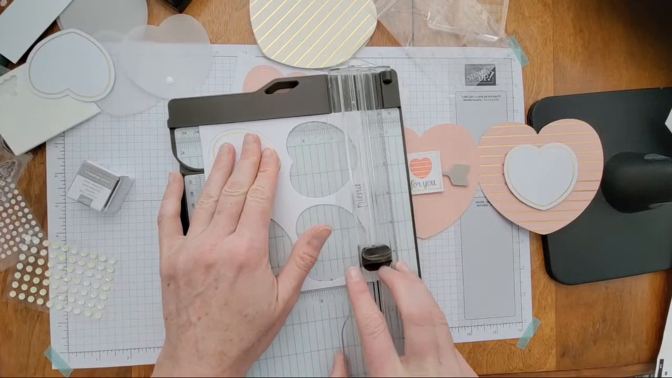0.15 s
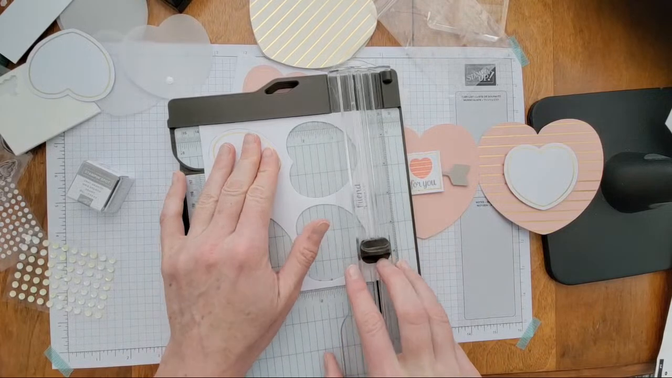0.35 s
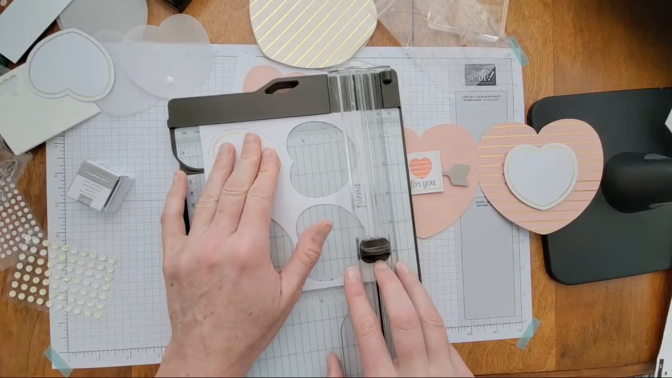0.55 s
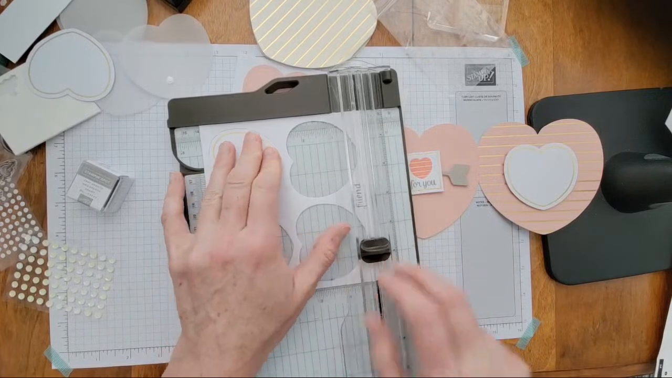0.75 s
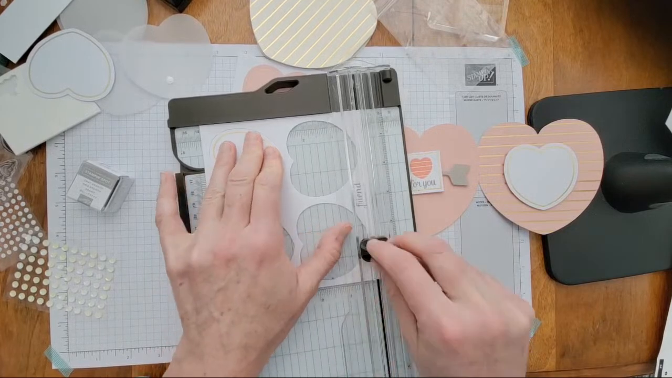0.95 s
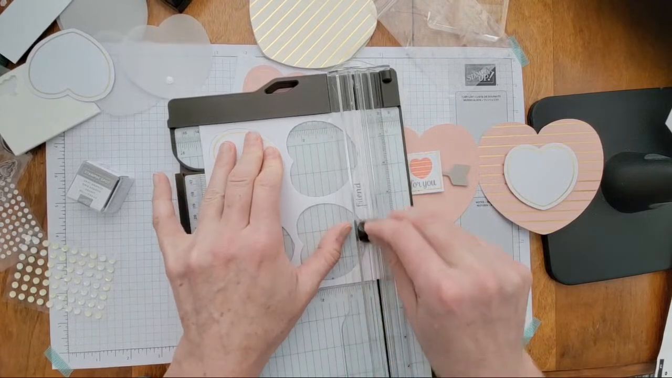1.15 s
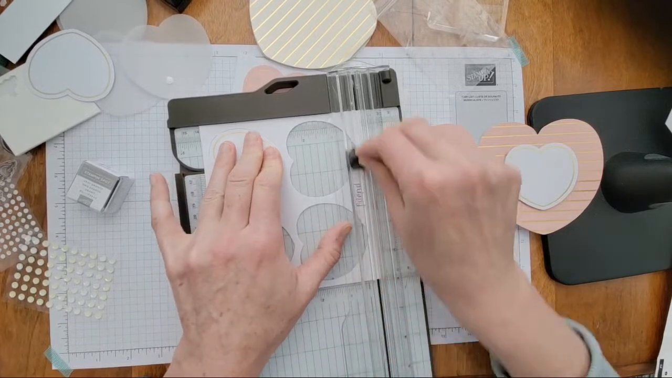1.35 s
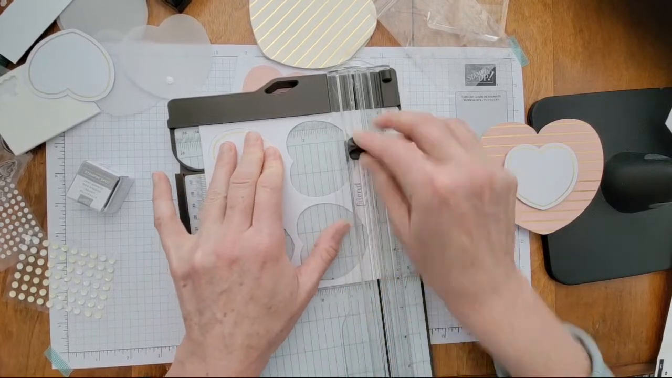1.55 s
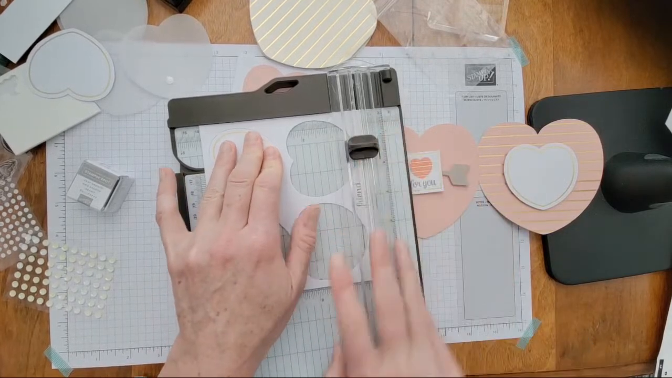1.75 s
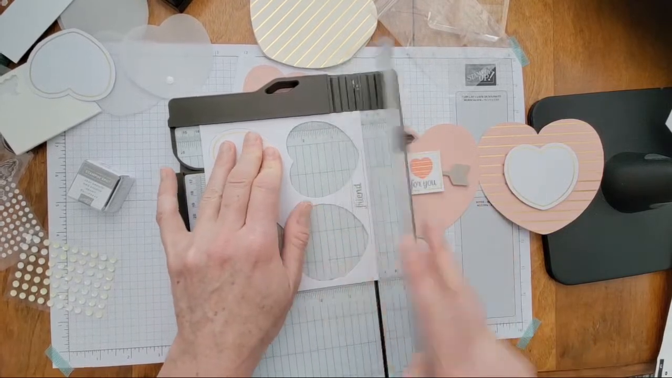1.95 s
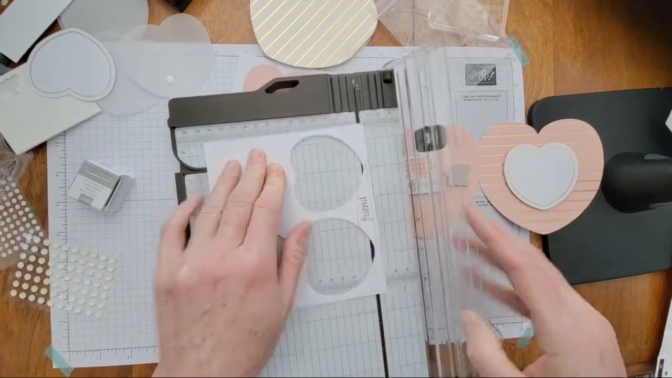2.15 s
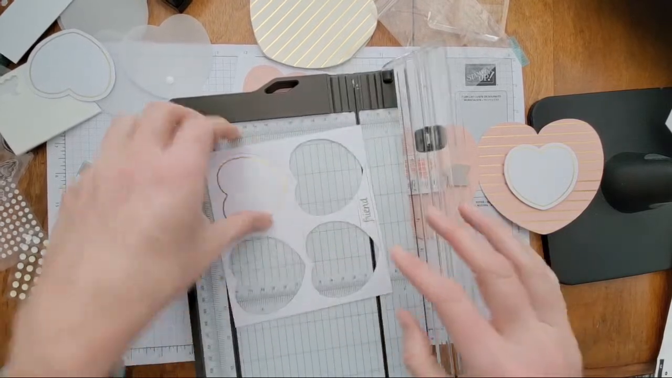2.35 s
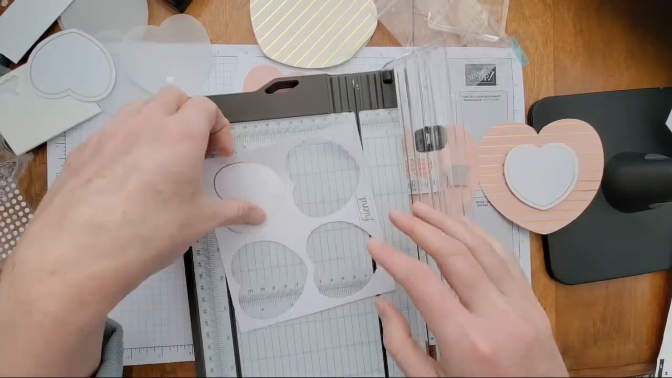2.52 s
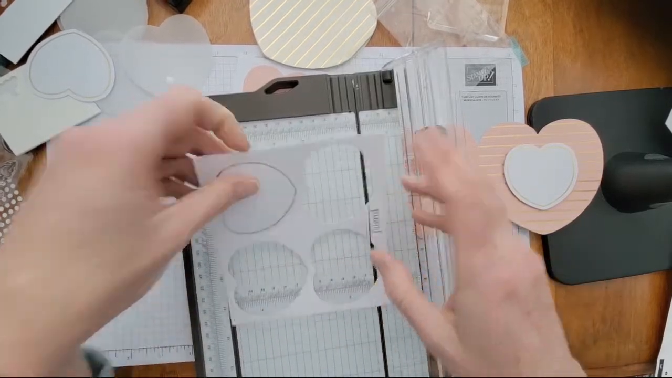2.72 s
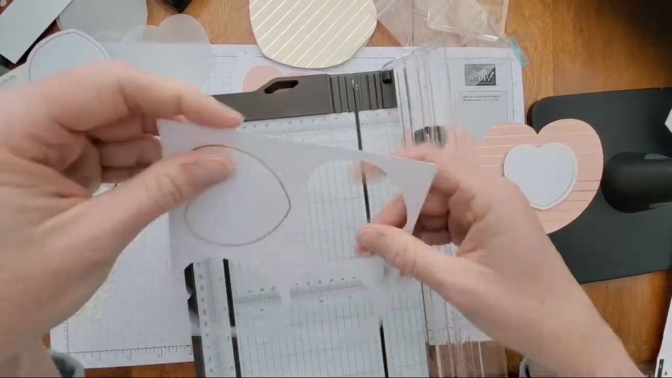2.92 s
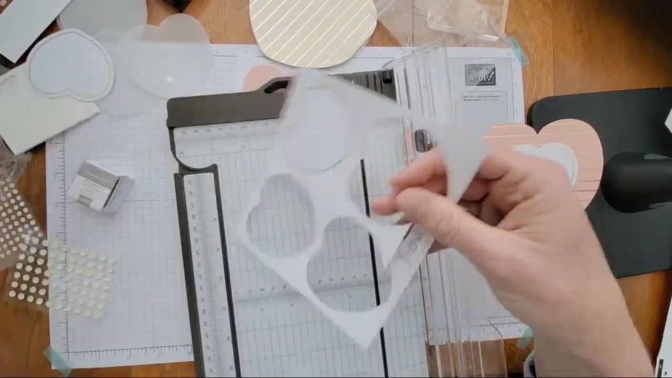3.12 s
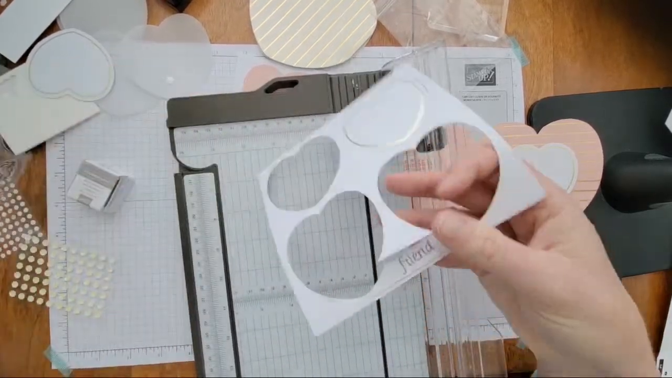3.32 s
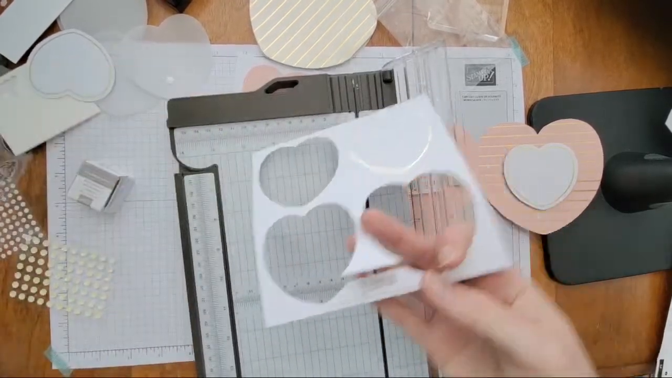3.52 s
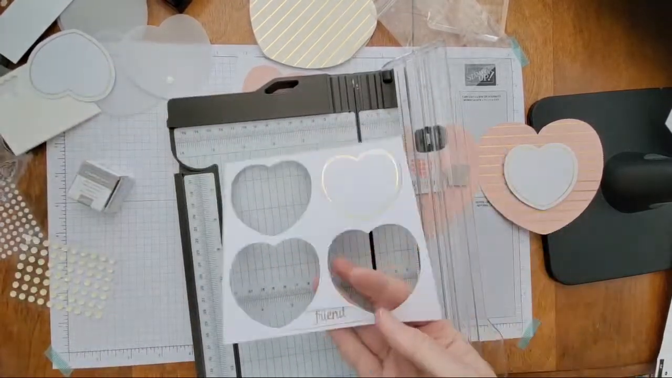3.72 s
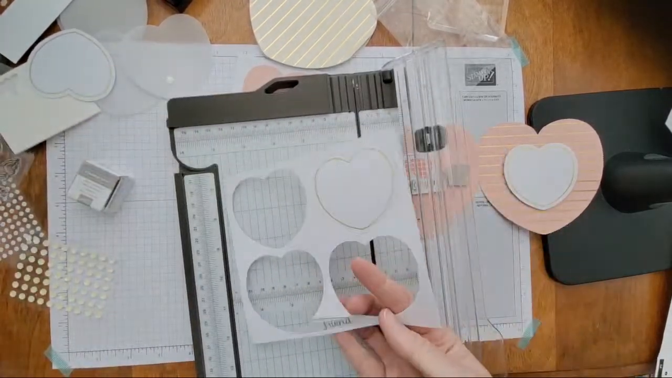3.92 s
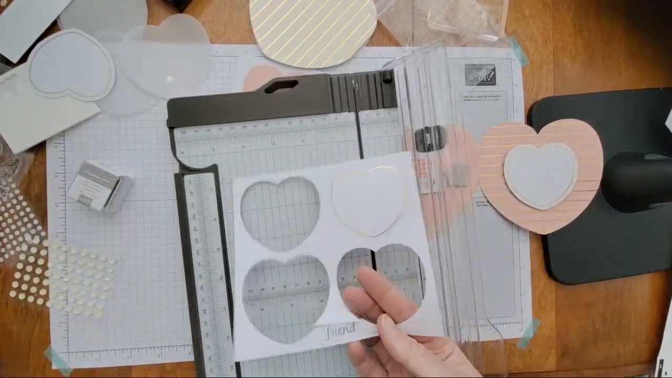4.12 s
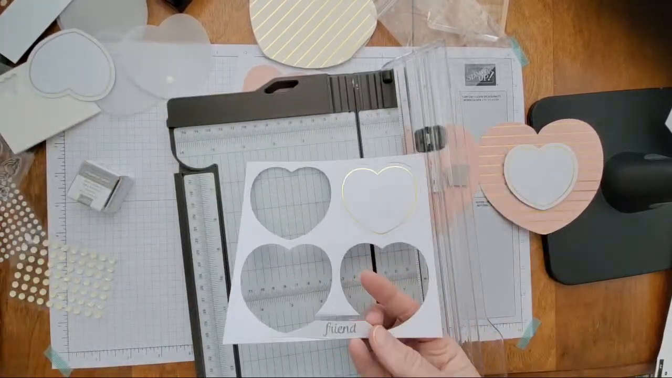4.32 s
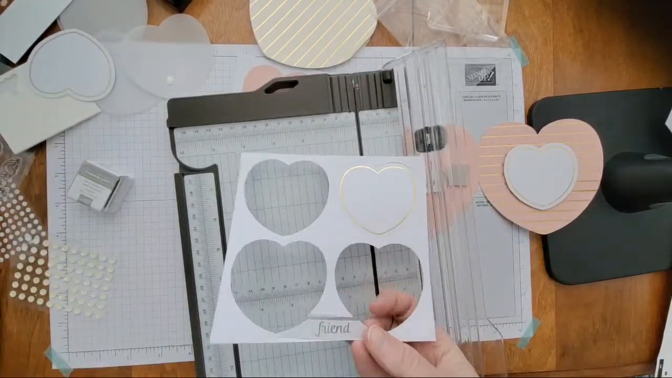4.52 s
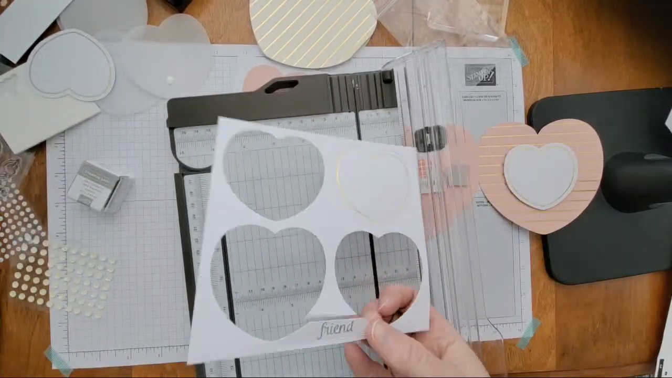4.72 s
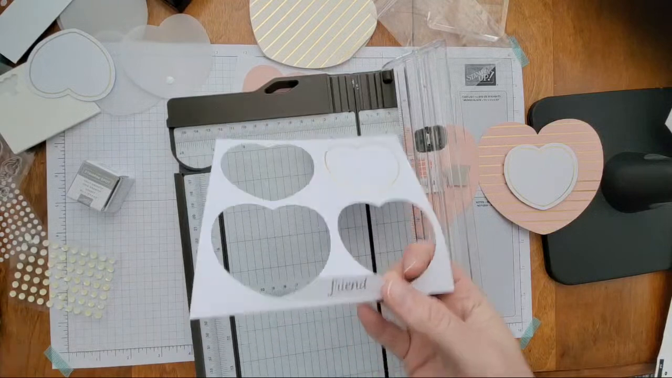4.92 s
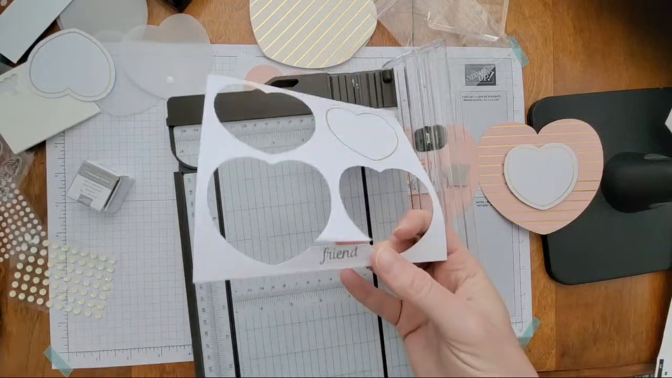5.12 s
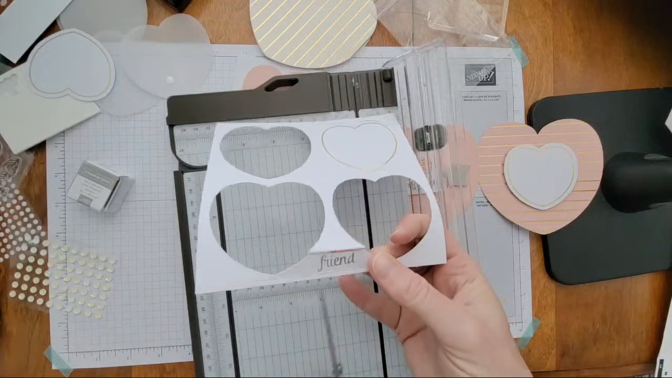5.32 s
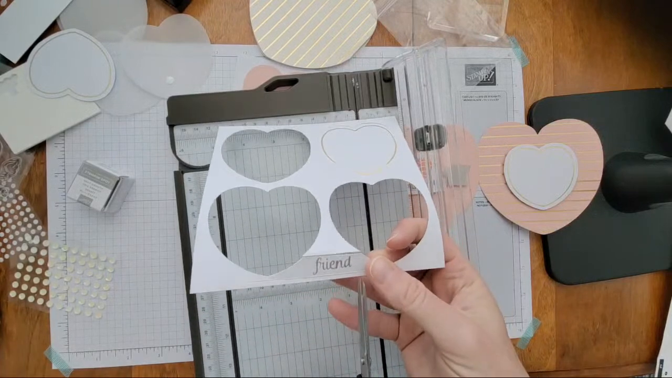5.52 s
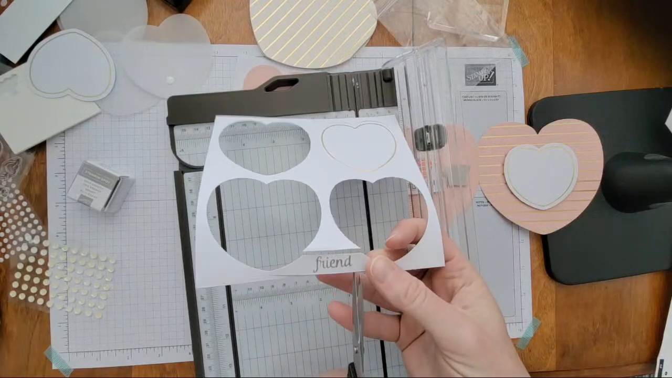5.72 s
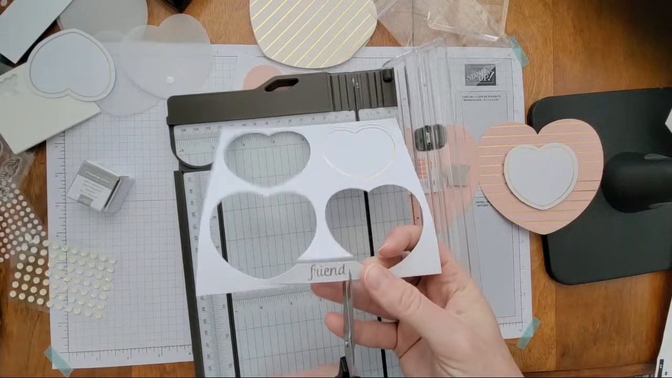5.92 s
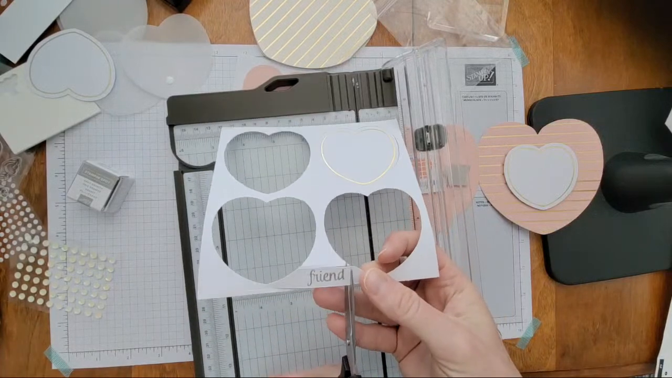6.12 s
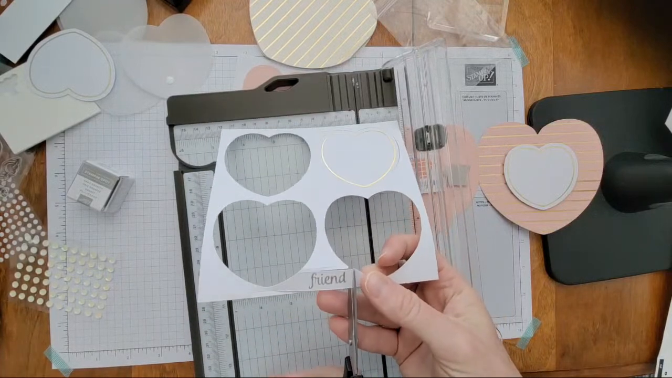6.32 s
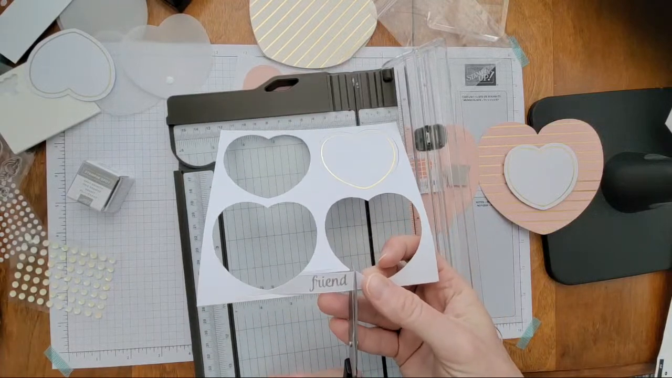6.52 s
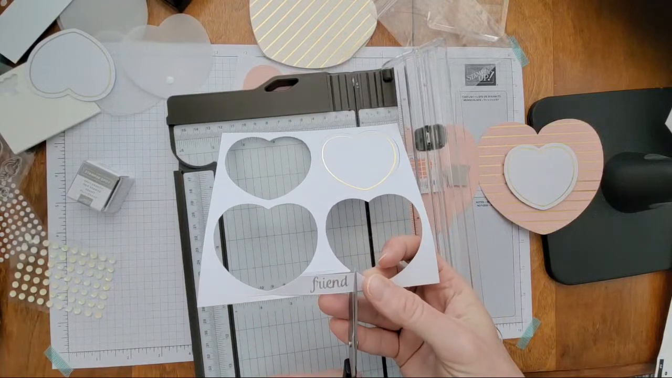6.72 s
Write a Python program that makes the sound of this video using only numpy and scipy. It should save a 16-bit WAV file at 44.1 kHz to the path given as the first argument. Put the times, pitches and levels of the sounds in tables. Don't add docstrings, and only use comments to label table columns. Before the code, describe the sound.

On a wooden craft desk, a trimmer carriage clicks and rips through card, its rail clatters open, the stiff card taps about, and scissors softly part.

```python
import sys
import numpy as np
from scipy import signal
from scipy.fft import rfft, irfft, next_fast_len
from scipy.io import wavfile
from scipy.ndimage import uniform_filter1d

SR = 44100
rng = np.random.default_rng(int(sys.argv[2]) if len(sys.argv) > 2 else 0)


def gain_from_db(level_db):
    decades = np.asarray(level_db, float) / 20
    return 10 ** decades


def master(y):
    cut = np.clip(np.atleast_2d(y).T, -1, 1)
    pcm = np.round(cut * 32767)
    wavfile.write(sys.argv[1], SR, pcm.astype(np.int16))


N = 302419


def rms_one(x):
    return x / np.sqrt(np.mean(x ** 2) + 1e-20)


def peak_one(x):
    return x / (np.max(np.abs(x)) + 1e-20)


def cut(x, hz, kind, order=2):
    return signal.sosfilt(signal.butter(order, hz, kind, fs=SR, output="sos"), x)


def coloured(x, spectrum):
    hz, db = np.transpose(spectrum)
    size = next_fast_len(len(x))
    freqs = np.fft.rfftfreq(size, 1 / SR) + 1
    gain = gain_from_db(np.interp(np.log(freqs), np.log(hz), db))
    return rms_one(irfft(rfft(x, size) * gain, size)[:len(x)])


def drift(rate_hz):
    pole = np.exp(-2 * np.pi * rate_hz * 40 / SR)
    noise = rng.standard_normal(N // 40 + 2002)
    slow = signal.lfilter([1], [1, -2 * pole, pole ** 2], noise)[2000:]
    return np.interp(np.arange(N) / 40, np.arange(len(slow)), rms_one(slow))


def grains(size, per_s, spread_db):
    chance, strength, sign = rng.random((3, size))
    heights = gain_from_db(-spread_db * np.log(strength + 0.001))
    return (chance < per_s / SR) * heights * np.sign(sign - .5) + 1e-9


def ring(x, hz, t60):
    r, w = gain_from_db(-60 / (max(t60, .002) * SR)), 2 * np.pi * hz / SR
    return signal.lfilter([0, np.sin(w)], [1, -2 * r * np.cos(w), r * r], x)


def resonance(x, hz, width_hz):
    return rms_one(ring(x, hz, 2.2 / width_hz))


def swells(rows):
    t = np.arange(0, N + 40, 40) / SR
    power = 0
    for s, db, rise, fall in rows:
        below_peak = np.maximum((s - t) / rise, (t - s) / fall)
        power = power + gain_from_db(2 * db - 40 * below_peak)
    return np.interp(np.arange(N) / SR, t, np.sqrt(power))


# f/Hz, level/dB per Hz
HUSH = [(30, -29.5), (41, -22), (60, -19), (98, -11.5), (145, -13), (183, -16.5), (221, -8.5), (327, -17),
        (393, -8.5), (425, -19), (582, -35), (664, -30.5), (2200, -40.5), (7050, -47), (11000, -42.5),
        (15900, -46.5)]


def room_tone(desk):
    hush = coloured(rng.standard_normal(N), HUSH)
    rumble = cut(hush, 550, "low", order=6)
    desk_power = uniform_filter1d(desk ** 2, int(.12 * SR))
    busy = np.maximum(desk_power, 1e-14) ** .15
    rumble_gain = (gain_from_db(-67.5) + gain_from_db(-51) * busy) * gain_from_db(1.2 * drift(4))
    return rumble_gain * rumble + gain_from_db(-66.5) * (hush - rumble)


# f/Hz, level/dB, t60/s
BOARD_MODES = [(448, -3, 0.03), (659, -2, 0.043), (773.6, -3, 0.038), (862.6, -7.5, 0.08), (970, 3, 0.027),
               (1197.3, 3, 0.02), (1461, -5, 0.062), (1657, 5.5, 0.017), (2066, 5.5, 0.013),
               (2480, 3, .012), (2950, 2, .011), (3500, -1, 0.01), (4120, -16.5, 0.013)]


def contacts(rows, click_db, crack_db, rattle_s, landing_s, size=7000):
    out, t = np.zeros(N + size), np.arange(size) / SR
    landing = (1 - np.exp(-t / landing_s)) * np.exp(-t / landing_s)
    dying = gain_from_db(-60 * t / rattle_s) * (1 - np.exp(-t / 0.0054))
    for s, peak_db, hz, hard_db in rows:
        slips = grains(size, per_s=8000, spread_db=2.0)
        rattle = slips * (landing + 0.21 * dying)
        strengths = gain_from_db(rng.normal(0, 2.5, len(BOARD_MODES)))
        board = sum(g * gain_from_db(db) * ring(rattle, f, t60) for g, (f, db, t60) in zip(strengths, BOARD_MODES))
        body = cut(peak_one(board) + 0.45 * peak_one(rattle), [300, 4000], "band")
        own = ring(rattle, hz, 25 / hz)
        click = cut(slips * (landing + .17 * dying), [1600, 5000], "band")
        crack = cut(slips * (landing + 0.04 * dying), [4600, 12500], "band")
        hit = peak_one(body) * min(1, (1500 / hz) ** 1.5) + .55 * peak_one(own)
        hit = peak_one(hit) + gain_from_db(click_db + hard_db) * peak_one(click)
        hit = hit + gain_from_db(crack_db + hard_db) * peak_one(crack)
        at = round(s * SR)
        out[at:at + size] += gain_from_db(peak_db) * hit
    return out[:N]


# t/s, peak level/dB, own ring f/Hz, hardness/dB
TRIMMER_KNOCKS = [(0.093, -46.5, 990, -5), (0.184, -46, 974, -10), (0.216, -38, 3750, -4),
                  (0.227, -47, 969, -20), (0.308, -35, 600, -17), (0.54, -60, 490, -12),
                  (0.744, -55, 454, -5), (0.7555, -35, 1900, 3), (0.849, -54.5, 650, 6),
                  (0.878, -42, 860, -19), (1.008, -52.5, 630, -12), (1.027, -44.5, 1010, -14),
                  (1.045, -33, 1026, -4), (1.108, -39, 590, -18), (1.516, -53, 1010, -5),
                  (1.534, -59, 1050, 11), (1.576, -41, 615, -23), (1.584, -36, 500, -22),
                  (1.637, -38, 560, -3), (1.816, -42, 400, -22), (1.868, -42.5, 1500, -5),
                  (1.879, -49, 1120, 2), (1.913, -38, 510, -3), (1.922, -26.5, 990, 0),
                  (1.956, -20, 950, -11), (1.971, -20, 617, -4), (1.999, -28.5, 640, -14),
                  (2.061, -27, 930, -10), (2.079, -35.5, 759, -8), (2.099, -32, 1820, -16)]


def trimmer_knocks():
    return contacts(TRIMMER_KNOCKS, click_db=1.0, crack_db=-14, rattle_s=.12, landing_s=.0017)


# t/s, peak level/dB, f/Hz, t60/s
PINGS = [(0.298, -58, 6960, 0.025), (1.047, -41.5, 6730, 0.034), (1.604, -36, 2900, .01),
         (1.6095, -19, 4250, .005), (1.6095, -22, 6800, .005), (1.613, -33, 3200, .07),
         (1.619, -36, 3600, .05), (1.617, -38, 7600, .04), (4.055, -25, 1080, .03), (4.056, -33, 1900, .05),
         (4.2275, -25, 2540, .012), (.755, -39, 2300, .03), (.093, -50, 1800, .02), (4.415, -41, 1860, .03),
         (5.995, -68, 7000, .012), (6.157, -70, 4000, .01), (1.635, -38, 620, .05), (1.604, -36, 7430, .02),
         (1.6093, -18, 3300, 0.0044), (1.6093, -22, 5460, 0.0026), (1.6105, -20, 7760, 0.0048),
         (3.597, -51, 870, 0.16), (3.927, -44.5, 860, 0.18), (2.413, -31.5, 1050, 0.027),
         (2.619, -38.5, 8600, 0.0077), (3.37, -38, 1860, 0.13), (3.477, -46, 3320, 0.08),
         (3.374, -38, 850, 0.2), (3.478, -40, 856, 0.13), (3.715, -52, 850, .1), (4.061, -40, 4734, 0.09),
         (4.06, -40, 3150, 0.035), (4.228, -38, 4550, .04), (3.904, -37, 6600, .012),
         (4.653, -46, 5450, .012), (5.02, -60, 4350, .1), (5.075, -58, 4500, .05), (2.095, -44, 3800, .03),
         (4.144, -42, 2800, 0.099), (2.894, -35, 1820, 0.02), (4.512, -35, 1784, 0.04),
         (5.689, -64, 3830, 0.008), (5.689, -66, 8500, 0.006), (6.07, -62, 4800, .03),
         (6.755, -58.5, 1140, 0.012)]


def pings(size=6000):
    out, t = np.zeros(N + size), np.arange(size) / SR
    for s, peak_db, hz, t60 in PINGS:
        chatter = rng.standard_normal(size) * np.exp(-t / (.11 * t60)) + 1e-12
        pair = ring(chatter, hz, .6 * t60) + .5 * ring(chatter, 1.04 * hz, .6 * t60)
        at = round(s * SR)
        out[at:at + size] += gain_from_db(peak_db) * peak_one(pair)
    return out[:N]


# f/Hz, t60/s, level/dB
ECHO_BANDS = [(150, 0.62, -8.5), (500, 0.14, -28), (1500, 0.15, -20.5), (4500, 0.29, -30.5),
              (12000, 0.05, -13.5)]


def room_echoes(x, size=20000):
    t, echo = np.arange(size) / SR, 0
    for hz, t60, db in ECHO_BANDS:
        band = cut(rng.standard_normal(size), [hz / 1.75, min(hz * 1.75, .45 * SR)], "band")
        echo = echo + gain_from_db(db) * band * gain_from_db(-60 * t / t60) / np.sqrt(t60 * SR / 14)
    after_gap = np.clip(t / 0.018 - .5, 0, 1)
    return signal.fftconvolve(x, echo * after_gap)[:N]


# peak t/s, level/dB, 20 dB rise/s, 20 dB fall/s
RUBS = [(.22, -68, .12, .6), (.838, -61.5, .18, .14), (1.05, -53, .055, .03), (1.61, -51, .08, .06),
        (1.946, -30, .022, .11), (2.12, -49, .15, .06), (2.8, -69, .6, .6), (3.054, -66, .2, .1),
        (3.52, -60, .2, .25), (3.8, -56, .1, .22), (4.14, -46.5, .16, .15), (4.44, -58, .03, .2),
        (4.54, -52, .06, .26), (4.985, -56, .015, .25), (4.78, -65, .08, .25)]
# peak t/s, level/dB, 20 dB rise/s, 20 dB fall/s
FLEXES = [(.3, -79, .6, .13), (.838, -71, .09, .11), (1.89, -76, .4, .15), (2.076, -65, .09, .14),
          (2.62, -69, .25, .9), (2.8, -66, .9, .22), (3.054, -71, .25, .15), (3.28, -76, .4, .05),
          (3.45, -71, .15, .5), (3.75, -61.5, .3, .13), (4.14, -58, .35, .05), (4.32, -70, .07, .8),
          (5.0, -72, .04, .25), (5.24, -74.5, .16, .25)]
# f/Hz, level/dB per Hz
RUBBING = [(180, -59), (300, -1.5), (740, -2.5), (849, -3.5), (1330, -5.5), (1460, -9), (3410, -24),
           (6000, -38), (7800, -51), (13200, -120)]
# f/Hz, level/dB per Hz
RUSTLE = [(1180, -32.5), (2000, -3), (2930, -3), (3540, -9), (4280, 3), (5790, -4), (8330, 2), (10600, -5),
          (15800, -1.5)]


def card():
    fibres = grains(N, per_s=15000, spread_db=3.0) * gain_from_db(1.2 * drift(25))
    clumped = fibres * np.sqrt(np.abs(fibres))
    rub = swells(RUBS)
    grit = gain_from_db(-1.0) * rub ** 1.4 * rms_one(cut(fibres, [2200, 4800], "band"))
    rustle = swells(FLEXES) * coloured(clumped, RUSTLE)
    return rub * coloured(fibres, RUBBING) + grit + rustle


# t/s, peak level/dB
THUDS = [(0.227, -59), (1.02, -50), (1.583, -45), (1.813, -50.5), (1.923, -32), (1.953, -34), (1.968, -26),
         (1.998, -25.5), (2.031, -39), (2.06, -40), (2.099, -42), (2.425, -41), (3.366, -47), (4.056, -45),
         (4.236, -29), (4.279, -37), (4.318, -48)]
# f/Hz, level/dB, t60/s
DESK_MODES = [(95, -12.5, 0.21), (112, 8, 0.25), (136, 13, .17), (205, 3, 0.08)]


def thuds():
    s, peak_db = np.transpose(THUDS)
    at, out = [round(hit * SR) for hit in s], np.zeros(N)
    for hz, mode_db, t60 in DESK_MODES:
        strengths = gain_from_db(peak_db + mode_db - 17 + rng.normal(0, 2.5, len(at)))
        pushes = np.full(N, 1e-12)
        pushes[at] = strengths * rng.choice([-1, 1], len(at))
        out += ring(pushes, hz, t60)
    return cut(out, [75, 350], "band")


# t/s, peak level/dB, own ring f/Hz, hardness/dB
BOUNCES = [(0.296, -47, 1300, 0), (1.593, -32, 420, -24), (1.645, -41, 3900, 0), (1.672, -52, 2200, 0),
           (1.688, -54, 3800, 0), (1.715, -55, 1300, 0), (2.11, -35, 1200, -8), (2.13, -37, 1100, -10),
           (2.413, -29, 900, -12), (4.38, -55, 2500, 4), (4.8, -54, 1500, -4), (1.588, -36, 330, -24),
           (1.919, -29, 1500, 0), (1.926, -27, 2000, 0), (1.951, -25, 2100, -1), (1.982, -26, 900, -8),
           (2.057, -48, 3700, 0), (3.788, -31, 800, -8), (3.797, -28, 2200, -4), (3.802, -28, 700, -8),
           (3.817, -33, 850, -12), (3.842, -36, 750, -12), (3.878, -44, 750, -12), (4.049, -46, 900, 2),
           (4.1, -46, 4200, 0), (4.122, -42, 800, -8), (4.145, -38, 900, -10), (4.223, -42, 1500, 0),
           (4.235, -27, 600, -8), (4.264, -33, 900, -6), (4.412, -31.5, 1040, -16), (4.43, -45, 900, -10),
           (4.518, -33, 1000, -8), (4.527, -35, 850, -10), (4.55, -42, 1500, -8), (4.612, -53, 4300, -2),
           (4.963, -45, 1100, -6), (4.978, -41, 750, -14), (4.99, -43, 1600, -5), (5.0, -45, 1450, -6),
           (5.035, -50, 2000, -4), (5.058, -49, 800, -12), (5.145, -56, 950, -10), (5.209, -44.5, 1100, -5)]


def bounces():
    return contacts(BOUNCES, click_db=-2.0, crack_db=-12, rattle_s=.045, landing_s=.0015, size=3000)


# t/s, rise/s, hold/s, level/dB, lowest f/Hz
SWEEPS = [(0.785, .01, 0.087, -73.5, 2500), (1.605, .003, 0.008, -41, 2500),
          (1.911, 0.0054, 0.026, -44, 2980), (2.117, 0.024, 0.077, -57, 6740),
          (2.407, .004, 0.055, -67, 3000), (2.642, 0.0066, 0.076, -54.5, 2970),
          (2.971, 0.0081, 0.057, -63.5, 2500), (3.123, .004, .03, -65.5, 3000),
          (3.25, 0.024, 0.079, -71.5, 5200), (3.37, .006, 0.12, -68, 3040), (3.72, 0.077, 0.061, -67, 3000),
          (4.04, .004, 0.11, -60, 3000), (4.222, 0.0034, 0.025, -58, 2980),
          (4.603, 0.021, 0.046, -67.5, 3500), (4.958, 0.0068, 0.12, -70, 2500),
          (5.22, 0.026, 0.11, -77.5, 6000)]


def sweeps():
    out, t = np.zeros(N), np.arange(N) / SR
    hiss = coloured(grains(N, per_s=20000, spread_db=1.6) * gain_from_db(1.2 * drift(40)), RUSTLE)
    for s, rise, hold, db, low_hz in SWEEPS:
        part = slice(round(s * SR), round((s + .6) * SR))
        age = t[part] - s
        fade = gain_from_db(-60 * np.maximum(age - rise - hold, 0) / (.12 + 1.6 * hold))
        shape = np.clip(age / rise, 0, 1) * fade
        out[part] += gain_from_db(db) * shape * cut(hiss[part], low_hz, "high")
    return out


def patchy(x):
    edges = 700 * 2 ** np.arange(0, 5, .5)
    out = cut(x, 700, "low")
    for k, (low, high) in enumerate(zip(edges, edges[1:])):
        bite = gain_from_db(1.6 * drift(30)[:len(x)])
        out = out + bite * cut(x, [low, high], "band") * (-1) ** k
    return rms_one(out)


# t/s, level/dB
STROKE = [
    (1.088, -77),
    (1.112, -50),
    (1.2, -44),
    (1.268, -43),
    (1.298, -43.5),
    (1.47, -46),
    (1.512, -66),
    (1.53, -66),
]
# f/Hz, level/dB per Hz
SCRAPE = [(120, -20), (200, -3), (322, -9.5), (353, 1), (490, -3), (610, 1), (1140, -3.5), (1930, -7.5),
          (2730, -2.5), (5470, -3.5), (9300, -7.5), (15800, -14)]
# f/Hz, width/Hz, level/dB, t/s, half span/s
RAIL = [(600, 120, 4, 1.18, 0.07), (900, 180, 0, 1.35, 0.029), (2836, 90, 7, 1.145, 0.03),
        (4250, 260, 1.5, 1.16, 0.04), (8400, 180, 0, 1.19, .015), (2600, 500, 6, 1.23, 0.035),
        (4900, 500, 4, 1.235, .035), (4720, 155, -3, 1.4, .03), (4025, 190, -1, 1.38, 0.024),
        (2800, 240, -1, 1.38, 0.016), (7460, 300, -2, 1.3, 0.026), (15570, 70, -6.5, 1.3, .2)]


def blade(size=2 * SR):
    t = np.arange(size) / SR
    s, drag_db = np.transpose(STROKE)
    drag = gain_from_db(np.interp(t, s, drag_db, -140, -140))
    tearing = rms_one(grains(size, per_s=10000, spread_db=2.5))
    rail = 0
    for hz, width_hz, db, passing_s, span in RAIL:
        nearness = np.exp(-.5 * ((t - passing_s) / span) ** 2)
        rail = rail + gain_from_db(db - 12.5) * nearness * resonance(tearing, hz, width_hz)
    desk = sum(gain_from_db(db) * ring(tearing, hz, t60) for hz, db, t60 in DESK_MODES)
    rumble = gain_from_db(-54) * peak_one(drag) * rms_one(cut(desk, 75, "high"))
    scrape = .8 * patchy(coloured(tearing, SCRAPE))
    cutting = drag * gain_from_db(1.6 * drift(40)[:size]) * (scrape + rail) + rumble
    return np.pad(cutting, (0, N - size))


# t/s, peak level/dB, own ring f/Hz, hardness/dB
CARD_SNAPS = [(1.941, -29.5, 840, 5), (2.302, -53, 1940, -4), (2.385, -64, 557, 5), (2.485, -44, 900, 1),
              (2.559, -59, 540, 12), (2.578, -59, 643, 13), (2.615, -43.5, 1010, 2), (2.719, -48, 1900, 3),
              (2.8925, -43, 2010, 11), (3.475, -35, 1800, 0), (3.652, -52.5, 1130, 3),
              (3.699, -52, 2200, 3), (3.745, -48, 900, 13), (3.9045, -43, 1000, 6), (4.0545, -25, 500, -1),
              (4.133, -35.5, 760, 3), (4.652, -50, 850, 4)]


def card_snaps():
    return contacts(CARD_SNAPS, click_db=-3, crack_db=-1.0, rattle_s=.06, landing_s=.0011)


# t/s, peak level/dB, own ring f/Hz, hardness/dB
DESK_TAPS = [(2.337, -51, 550, -4), (2.4125, -30, 751, -16), (2.439, -41, 500, -18),
             (2.645, -39.5, 4520, -12), (2.667, -35.5, 813, -14), (2.98, -45, 1130, -5),
             (3.039, -57, 956, -8), (3.129, -53.5, 1075, -3), (3.36, -37.5, 468, -5), (3.367, -33, 853, -6),
             (3.595, -49.5, 870, -7), (3.783, -33, 600, -12), (3.83, -41, 696, 0), (3.924, -46.5, 798, -6),
             (4.034, -43, 900, -6), (4.2272, -23, 596, 1), (4.249, -27, 1900, -8), (4.279, -39, 2000, -3),
             (4.319, -45, 550, -6), (4.502, -38.5, 497, -15), (4.51, -29.5, 864, -13),
             (4.756, -50.5, 827, -3), (4.788, -44.5, 503, -13), (4.968, -42, 500, -15),
             (5.02, -53, 900, -5), (5.083, -49, 635, -10)]


def desk_taps():
    return contacts(DESK_TAPS, click_db=-1.0, crack_db=-12, rattle_s=.125, landing_s=.0012)


# peak t/s, level/dB, 20 dB rise/s, 20 dB fall/s
SHEARS = [
    (5.815, -69.5, .03, .3),
    (5.95, -79, .15, .15),
    (6.07, -75, .06, .05),
    (6.195, -73.5, .07, .06),
]
# peak t/s, level/dB, 20 dB rise/s, 20 dB fall/s
FINGERS = [
    (5.798, -66, .02, .06),
    (6.03, -69.5, .9, .15),
]
# f/Hz, width/Hz, level/dB
BLADES = [(2300, 1500, -9), (3900, 700, -6), (4850, 450, 0), (7300, 1600, -3), (9900, 1800, -6)]


def scissors():
    friction = grains(N, per_s=4500, spread_db=2.0)
    steel = rms_one(sum(gain_from_db(db) * resonance(friction, hz, width_hz) for hz, width_hz, db in BLADES))
    skin = rms_one(cut(friction, [300, 900], "band"))
    return swells(SHEARS) * gain_from_db(1.9 * drift(20)) * steel + swells(FINGERS) * skin


def scene():
    desk = trimmer_knocks() + pings() + card() + bounces() + sweeps()
    desk = desk + blade() + card_snaps() + desk_taps() + scissors()
    return (desk + thuds() + gain_from_db(11.5) * room_echoes(desk) + room_tone(desk))[None]


def band_limit(x):
    return signal.sosfilt(signal.butter(12, 16500, fs=SR, output="sos"), x)


def record(dry):
    bassless = cut(dry, 50, "high", order=3)
    top_cut = signal.ellip(12, .3, 62, 15800, fs=SR, output="sos")
    return band_limit(signal.sosfilt(top_cut, bassless))


dry = scene()
out = record(dry)
master(out)
```